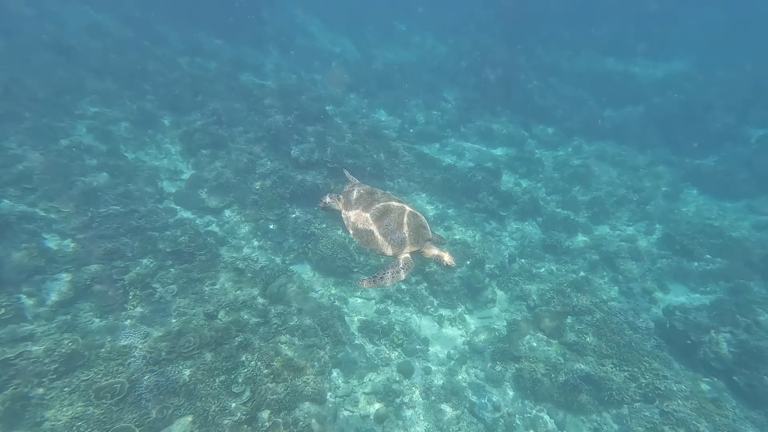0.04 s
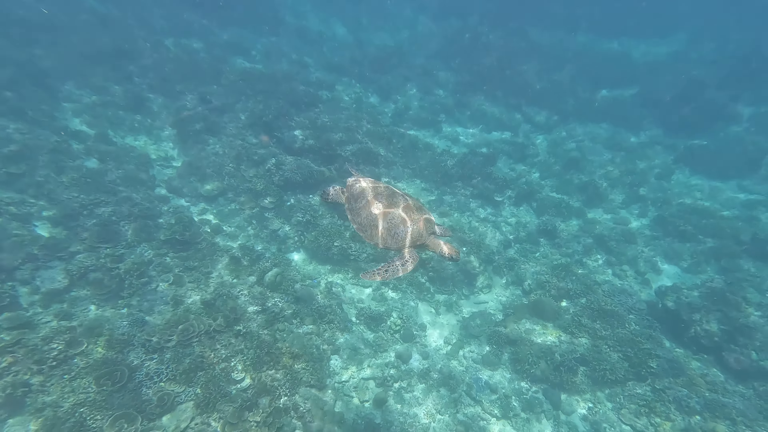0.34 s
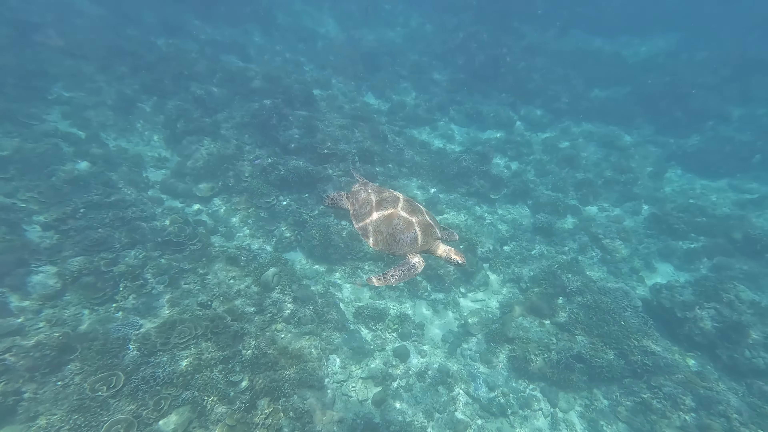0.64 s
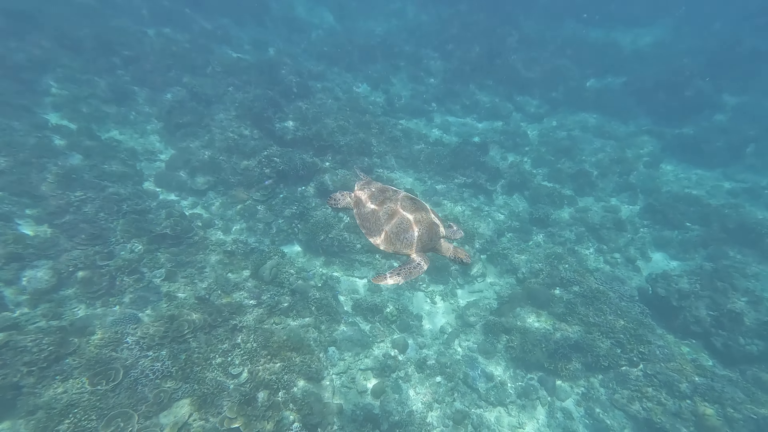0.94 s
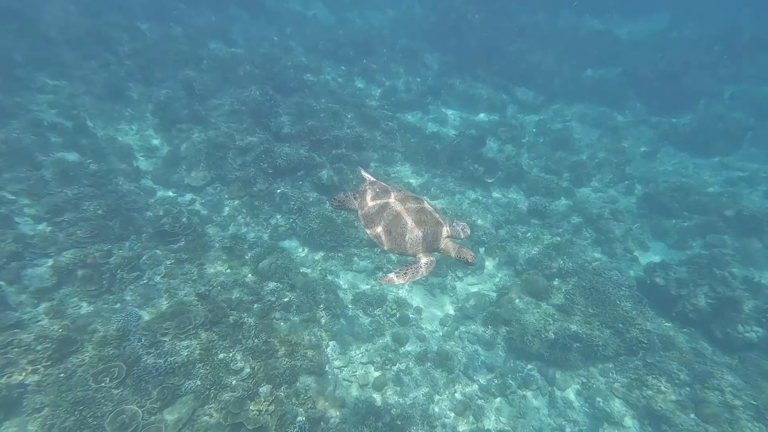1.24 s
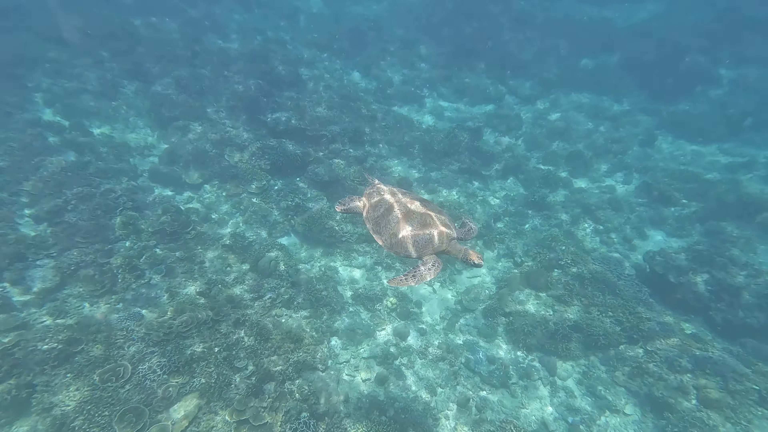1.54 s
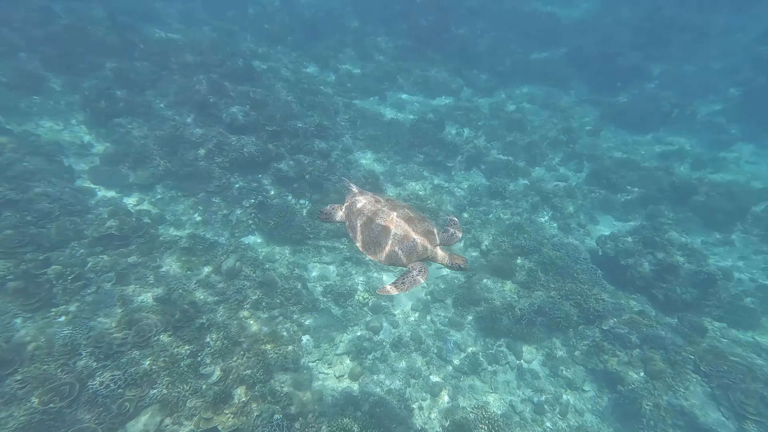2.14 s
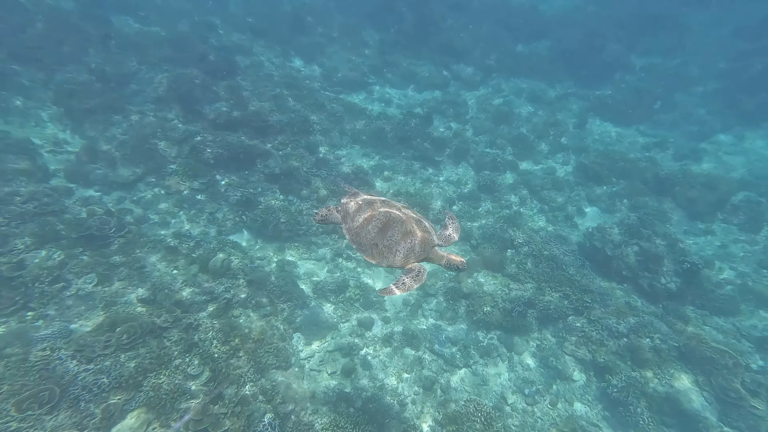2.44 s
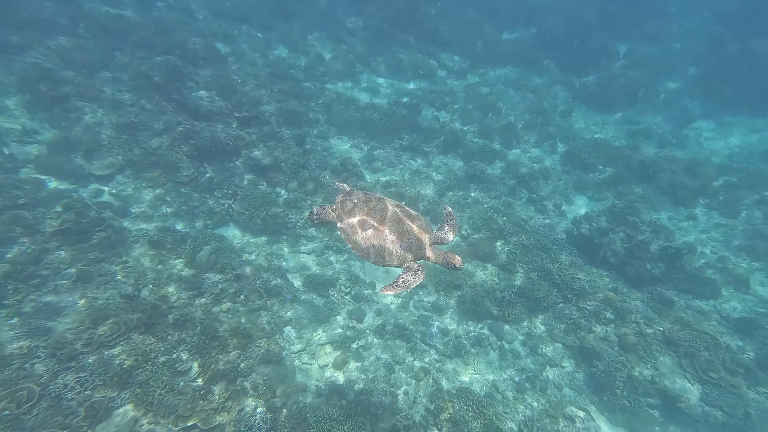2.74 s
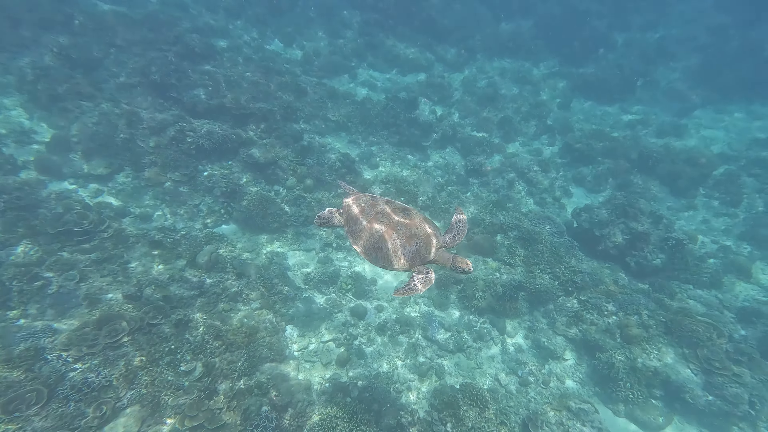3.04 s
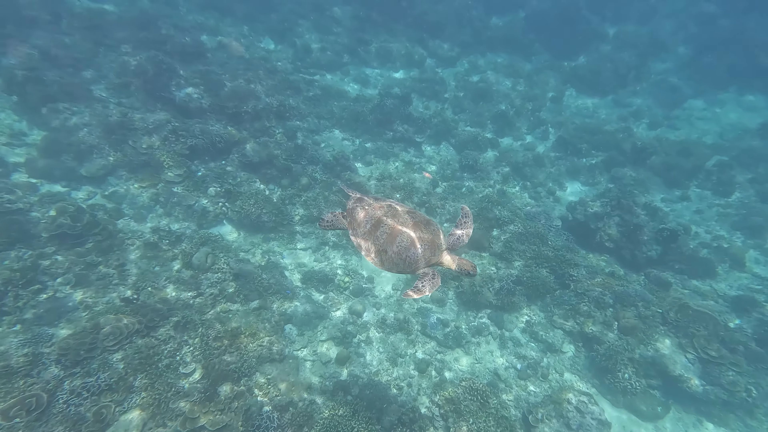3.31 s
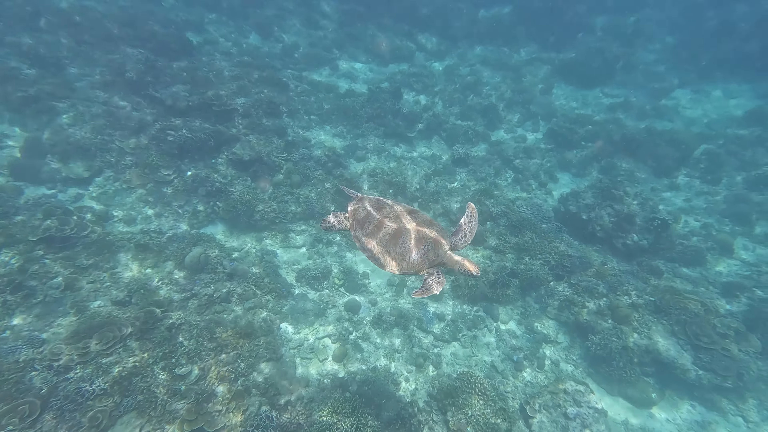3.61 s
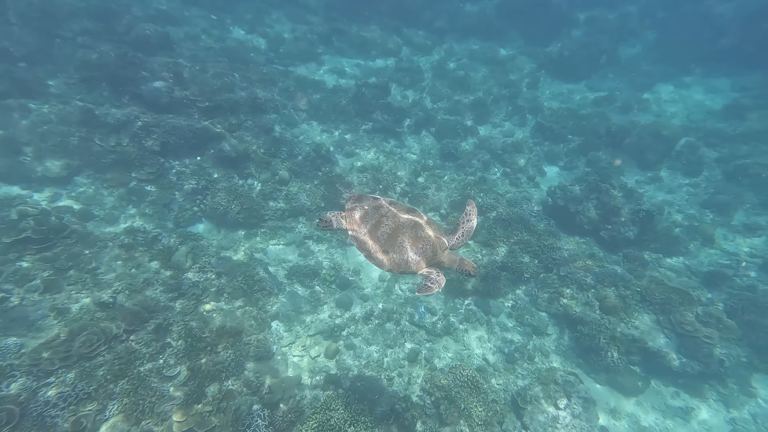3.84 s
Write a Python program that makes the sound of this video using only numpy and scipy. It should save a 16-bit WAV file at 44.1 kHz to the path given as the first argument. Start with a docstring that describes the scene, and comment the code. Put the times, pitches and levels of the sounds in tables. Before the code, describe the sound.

Sharp clicks and crackles fill an underwater reef, above a muffled rumble, soft bubbling and occasional bumps on the camera case.

```python
"""Snapping shrimp crackle all over a coral reef, heard underwater from a microphone inside a drifting,
hand-held waterproof camera case. Each claw collapses a cavitation bubble whose pressure spike rings the
case: close snaps click sharply, the countless far ones merge into a steady whine. Water rumbles past and
slaps the case, the surface washes overhead, small bubbles gurgle close by, and the hand knocks the case
a few times. The camera's gain ducks after the loudest peaks."""
import sys
import numpy as np
from scipy import signal
from scipy.fft import rfft, irfft, next_fast_len
from scipy.io import wavfile
from scipy.ndimage import map_coordinates

SR = 44100
rng = np.random.default_rng(int(sys.argv[2]) if len(sys.argv) > 2 else 0)


def store_pcm(level_fs):
    """Save levels as 16-bit WAV."""
    pcm = np.round(np.clip(level_fs, -1, 1) * 32767).astype(np.int16)
    wavfile.write(sys.argv[1], SR, np.atleast_2d(pcm).T)


N = 288855


def amp(db):
    """Decibels to gain."""
    return 10 ** (np.asarray(db) / 20)


def unit_rms(x):
    """x scaled to rms 1."""
    return x / np.sqrt(np.mean(x ** 2) + 1e-20)


def spectrum_db(points, hz):
    """Rows of freq_hz, level_db read at hz on a log axis."""
    freq_hz, level_db = np.transpose(points)
    return np.interp(np.log(hz + 1), np.log(freq_hz), level_db)


def level_curve(points):
    """Rows of time_s, level_db joined into one level per sample."""
    time_s, level_db = np.transpose(points)
    return np.interp(np.arange(N) / SR, time_s, level_db)


def wobble(rate_hz):
    """A smooth random curve with rate_hz knots a second."""
    knots = rng.standard_normal(int(N * rate_hz / SR) + 4)
    return map_coordinates(knots, [np.arange(N) * rate_hz / SR])


def filtered(x, response):
    """x through a filter whose gain is response(hz)."""
    size = next_fast_len(N + SR // 2)
    return irfft(rfft(x, size) * response(np.fft.rfftfreq(size, 1 / SR)), size)[:N]


def noise(spectrum):
    """Coloured noise of rms 1."""
    return unit_rms(filtered(rng.standard_normal(N), lambda hz: amp(spectrum_db(spectrum, hz))))


def add(track, start_s, sound):
    """Mix a sound into the track from start_s."""
    start = int(np.clip(round(start_s * SR), 0, N))
    track[start:start + len(sound)] += sound[:N - start]


# Strength of the water moving right past the case: time_s, level_db
FLOW_LEVELS = [(0.0, -30), (0.56, -31.5), (0.95, -36.5), (1.4, -27), (2.55, -31), (2.9, -29), (3.61, -36),
               (4.23, -27.5), (4.82, -32), (5.58, -25), (6.33, -32.5), (6.55, -34)]
# Spectra of its slow swells and of its eddies: freq_hz, level_db
SWELL_SPECTRUM = [(10, -12), (20, -1), (36, 0), (52, -8), (80, -18), (140, -38), (600, -120)]
EDDY_SPECTRUM = [(35, -27), (70, 3), (110, -2.5), (170, -10), (300, -16), (900, -58), (3000, -120)]

def water_flow():
    """One flow drives both the slow pressure swells and the smaller eddies on the case."""
    flow_db = level_curve(FLOW_LEVELS)
    swells = amp(flow_db + 0.5 + 3.4 * wobble(rate_hz=8.8)) * noise(SWELL_SPECTRUM)
    eddies = amp(flow_db - 11 + 3.5 * wobble(rate_hz=22)) * noise(EDDY_SPECTRUM)
    return swells + eddies


# Strength of the wash at the surface, above the microphone: time_s, level_db
WASH_LEVELS = [(0.0, -36.5), (0.22, -35), (0.46, -40.5), (1.06, -45.5), (1.95, -38.5), (2.59, -41),
               (3.04, -45.5), (3.81, -42), (4.07, -39), (4.98, -32), (6.29, -45), (6.55, -40.5)]
# Spectrum of its swish: freq_hz, level_db
SWISH_SPECTRUM = [(90, -33.5), (170, -0.5), (250, 1), (330, -5), (400, -0.5), (490, 4), (580, -9.5),
                  (680, 0.5), (830, -18), (1200, -14.5), (5000, -120)]

def surface_wash():
    """The surface washes overhead with a low, fluttering swish."""
    return amp(level_curve(WASH_LEVELS) - 1.5 + 1.7 * wobble(rate_hz=40)) * noise(SWISH_SPECTRUM)


def bubbles(length_s, pitch_hz, count, spread, cycles, rise=0.63):
    """Bubbles born within length_s; each rises in pitch as it rings down 40 dB in about `cycles` cycles."""
    t = np.arange(int((length_s + 0.094) * SR)) / SR
    birth_s = length_s * rng.random((count, 1))
    hz = pitch_hz * np.exp(spread * rng.standard_normal((count, 1)))
    age_s = np.maximum(t - birth_s, 0)
    life = age_s * hz / cycles
    envelope = rng.uniform(0.09, 1, (count, 1)) * amp(-40 * life)
    phase = 2 * np.pi * hz * age_s * (1 + rise * np.minimum(life, 1))
    cloud = np.sum(envelope * np.sin(phase), axis=0)
    return cloud / np.sqrt(np.sum(cloud ** 2) / (length_s * SR))


def stray_bubbles(count, pitch_hz):
    """Single small bubbles burble on, louder where the surface washes harder."""
    out = np.zeros(N)
    for when, size, tone in rng.random((count, 3)):
        bubble = bubbles(0.01017, pitch_hz * 2 ** (2 * tone - 1), count=1, spread=0.16, cycles=6.9)
        add(out, when * N / SR, size ** 2 * bubble)
    return amp(level_curve(WASH_LEVELS) - 8) * unit_rms(out)


# Bubble clouds close beside the case: start_s, rms_db, length_s, pitch_hz
BUBBLE_CLOUDS = [(.267, -33.5, 0.018, 425), (0.809, -30, 0.016, 414), (1.42, -33, 0.0119, 350),
                 (1.835, -37, .12, 396), (2.671, -28.5, 0.055, 534), (3.247, -37, .045, 766),
                 (3.354, -32, .06, 443), (3.626, -33.5, 0.017, 530), (3.679, -32.5, 0.02, 540),
                 (3.739, -42.5, 0.055, 504), (3.859, -36.5, .02, 510), (3.961, -34, .099, 423),
                 (5.501, -30.5, 0.042, 348), (5.585, -31.5, 0.023, 301), (5.689, -32, .041, 193),
                 (6.039, -31.5, 0.02, 684), (6.354, -32.5, .012, 575), (6.466, -29, 0.01, 540)]

def gurgles():
    """Air stirred into the water breaks up; longer gurgles hold more bubbles."""
    out = np.zeros(N)
    for start_s, rms_db, length_s, pitch_hz in BUBBLE_CLOUDS:
        count = 4 + int(300 * length_s)
        add(out, start_s, amp(rms_db) * bubbles(length_s, pitch_hz, count, spread=0.35, cycles=8.1))
    return out


# Water slapping directly on the case: start_s, peak_db, pitch_hz
WATER_SLAPS = [(0.596, -14, 41.4), (0.653, -18, 53.3), (0.697, -16.5, 45.7), (1.2, -29.5, 106),
               (1.64, -17.5, 61.4), (1.711, -21, 77.5), (2.562, -26, 45), (2.736, -18, 62),
               (4.029, -19, 67), (5.311, -21, 60), (5.361, -23, 48.7), (5.492, -15, 34.8), (5.659, -17, 45),
               (5.75, -15, 55.4), (5.847, -10.5, 59), (6.283, -14.5, 53.3)]

def water_slaps(rise_cycles):
    """Each slap rocks the case for two or three cycles."""
    out, t = np.zeros(N), np.arange(SR // 4) / SR
    for start_s, peak_db, pitch_hz in WATER_SLAPS:
        age = pitch_hz * t / rise_cycles
        swell = age ** 2 * np.exp(2 - 2 * age)
        add(out, start_s, amp(peak_db) * swell * np.sin(2 * np.pi * pitch_hz * t))
    return out


# Low modes of the case held in the hand: pitch_hz, level_db, t60_s
HELD_CASE_MODES = [(91, -15, 0.035), (159.3, -6.5, 0.16), (242, 2, 0.035), (344, 13.5, 0.044)]
# Skin rubbing on the case: freq_hz, level_db
SCUFF_SPECTRUM = [(80, 6.5), (250, 6), (700, -4), (1400, -1.5), (2500, -35), (7000, -71), (12000, -120)]
# Knocks on the case, right at the microphone: start_s, swing_db, contact_s, shove_db, scuff_db
HAND_KNOCKS = [(2.396, -26, 0.0029, -11, -13), (4.138, -8.5, 0.004, -29, -24),
               (4.852, -8.5, 0.0042, -31, -41), (5.168, -5, .0052, -40, -14),
               (6.507, -27, 0.0062, -15.5, -25.5)]

def hand_knocks():
    """A push of the hand shoves the case and sets it swinging, while the skin scuffs it."""
    out, scuff_envelope = np.zeros(N), np.zeros(N)
    t = np.arange(SR // 5) / SR
    for start_s, swing_db, contact_s, shove_db, scuff_db in HAND_KNOCKS:
        swing = sum(amp(level_db + rng.normal(0, 1) - 60 * t / t60_s) * np.cos(2 * np.pi * pitch_hz * t)
                    for pitch_hz, level_db, t60_s in HELD_CASE_MODES)
        push = np.sin(np.pi * np.minimum(t / contact_s, 1))
        thud = signal.fftconvolve(swing, push ** 2)[:len(t)]
        shove = amp(shove_db) * np.sqrt(np.abs(push))
        add(out, start_s, -amp(swing_db) * thud / np.abs(thud).max() - shove)
        add(scuff_envelope, start_s, amp(scuff_db - 60 * t / 0.053))
    scuffs = scuff_envelope * noise(SCUFF_SPECTRUM)
    # the soft hand and the wall pass little treble
    return filtered(out + scuffs, lambda hz: 1 / (1 + 1j * hz / 2500) ** 3)


# What the case wall lets through to the microphone: freq_hz, gain_db
WALL_RESPONSE = [(100, -33.5), (500, -26), (880, -29), (1300, -19), (1900, -12.5), (3200, -10.5),
                 (3900, -15), (4800, -36.5), (7400, -44.5), (8200, -55), (9500, -58.5), (11500, -72.5),
                 (15000, -84)]
# Resonances and antiresonances that colour the case's ring: centre_hz, width_hz, gain_db
CASE_RESONANCES = [(1480.5, 425, 17.5), (2200, 150, -29), (2594, 280, 14.5), (2803, 260, -7),
                   (3674, 270, 7.5), (7230, 510, 6)]

def case_ring(tilt_db_per_octave, round_db, colour_db=0, samples=2048):
    """The case's ring after one spike, peak 1; each direction of arrival gives it a random colour."""
    hz = np.fft.rfftfreq(samples, 1 / SR)
    db = spectrum_db(WALL_RESPONSE, hz)
    for centre_hz, width_hz, gain_db in CASE_RESONANCES:
        db += gain_db / (1 + (2 * (hz - centre_hz) / width_hz) ** 2)
    db += tilt_db_per_octave * np.log2(np.clip(hz, 1300, 4500) / 2000)
    # a rounder spike gathers its energy near the main resonances
    db -= round_db * np.log2(np.clip(hz, 1000, 6500) / 2400) ** 2
    db += colour_db * map_coordinates(rng.standard_normal(64), [hz / 400])
    # minimum phase: a sharp start, then the ringing
    cepstrum = irfft(np.log(amp(db)))
    response = np.exp(rfft(2 * cepstrum[:samples // 2], samples) - cepstrum[0])
    # bending waves in the wall disperse, so the ring swells over its first cycle
    dispersion = ((2500 - 1j * hz) / (2500 + 1j * hz)) ** 3
    ring = irfft(response * dispersion)
    return ring / np.abs(signal.hilbert(ring)).max()


def far_shrimp(count, level_db, tilt_db_per_octave):
    """The farthest snaps overlap and keep the case ringing in a slightly wavering whine."""
    spikes = np.bincount(rng.integers(N, size=count), rng.standard_normal(count), N)
    waver_db = 1.3 * wobble(rate_hz=6)
    whine = signal.fftconvolve(spikes, case_ring(tilt_db_per_octave, round_db=-4.0))[:N]
    return amp(level_db + waver_db) * unit_rms(whine)


def reef_echo(snaps, t60_s, level_db):
    """Coral heads and the rippled surface scatter each snap into a short, sparse, ever-changing tail."""
    t = np.arange(SR // 10) / SR
    out, hop = np.zeros(N), SR // 12
    window = signal.windows.cosine(2 * hop)
    for start in range(0, N, hop):
        part = snaps[start:start + 2 * hop]
        tail = rng.standard_normal(len(t)) ** 3 * amp(-60 * t / t60_s) * (t > .002)
        add(out, start / SR, signal.fftconvolve(part * window[:len(part)], tail / np.linalg.norm(tail)))
    return amp(level_db) * out


def midrange_shrimp(count, near_db, far_db, tilt_db_per_octave, tilt_spread):
    """Shrimp spread evenly over the reef, heard by 1 / distance: many faint snaps, few strong ones."""
    out = np.zeros(N)
    for area, (when, tone) in zip(np.linspace(0, 1, count), rng.random((count, 2))):
        distance = np.sqrt(amp(-2 * near_db) + area * amp(-2 * far_db))
        ring = case_ring(tilt_db_per_octave + tilt_spread * (2 * tone - 1), round_db=-1.14, colour_db=3)
        add(out, when * N / SR, ring / distance)
    return out


# Snaps of the shrimp closest to the microphone: start_s, peak_db, tilt_db_per_octave
CLOSE_SNAPS = [(0.0038, -7.5, 3), (0.0956, -11, 0.5), (0.1326, -11, 10.5), (0.1519, -7, 3),
               (0.221, -8.5, -3.5), (0.3063, -13, 1), (0.347, -8.5, 3), (0.372, -9, -4.5),
               (0.4164, -6.5, 1.5), (0.4311, -4, 2), (0.4659, -6.5, 1), (0.4746, -9.5, -4.5),
               (0.6471, -5, -3.5), (0.6773, -7, 5), (0.704, -7.5, 4.5), (0.7739, -8.5, -6),
               (0.9477, -10.5, 13), (1.0195, -7, 3.5), (1.0432, -5.5, 3), (1.0635, -7, 4.5),
               (1.1605, -10.0, 3), (1.2419, -10, -10.5), (1.385, -12.5, -4), (1.394, -8.5, -4),
               (1.4116, -7, -1.5), (1.4619, -7.5, -1.5), (1.5061, -1.0, -6), (1.5834, -5, -3),
               (1.6313, -5, 4.5), (1.6749, -9.5, 12.5), (1.691, -11, -15), (1.7884, -14, -9),
               (1.8051, -10, -12.5), (1.8313, -8.0, -3), (1.9763, -9.5, 3), (1.9867, -3, -1),
               (2.0262, -10, 1.5), (2.108, -10, 7), (2.129, -7.5, 10), (2.1676, -9.5, 5),
               (2.206, -7.5, 0.5), (2.2302, -7, 7.5), (2.2656, -14, -5), (2.3371, -8, 11.5),
               (2.3899, -9, 5.5), (2.403, -8.5, -5), (2.4379, -6.5, -5.5), (2.5195, -10.5, -13.5),
               (2.5451, -5.5, 11.5), (2.6117, -5.5, -5), (2.6954, -10.5, -9), (2.705, -6.5, -2),
               (2.7197, -8.5, -10), (2.7429, -11, 12.5), (2.7523, -9.5, 1), (2.8248, -6.5, -4),
               (2.9822, 0.5, -6), (3.124, -6, -0.5), (3.1814, -11, 0.5), (3.252, -10, -0.5),
               (3.29, -6, -1.5), (3.331, -10, 1), (3.3404, -11, 0), (3.3501, -6.5, 8), (3.4686, -9.5, 14.5),
               (3.5168, -10, -3.5), (3.5864, -8.5, -6), (3.618, -8.0, 3), (3.889, -8.5, 4.5),
               (3.953, -11.0, 4.5), (3.9807, -8, 2), (3.9914, -6.5, 6), (4.0142, -6, -3),
               (4.0285, -8, -0.5), (4.1164, -10.5, -2), (4.2425, -4, -4.5), (4.272, -7, 1.5),
               (4.3063, -11, -0.5), (4.4018, -8, -4.5), (4.4546, -9, -9), (4.4787, -9.5, -1),
               (4.5005, -6.5, 1), (4.5426, -2.5, -3), (4.5674, -2.5, -9), (4.6646, -14, -6),
               (4.6828, -9.5, -7.5), (4.6909, -9.5, 6), (4.7156, -10.0, 7), (4.7703, -9, 8.5),
               (4.8141, -13, -0.5), (4.87, -12, -12), (4.9073, -8.5, 7), (4.928, -11.5, 2), (4.9622, -9, 6),
               (5.0776, -13.5, 15), (5.118, -9.5, -1.5), (5.1668, -5, -4.5), (5.19, -7.5, 4.5),
               (5.2702, -11.5, 3), (5.286, -10.5, 7), (5.4176, -8, -10), (5.473, -12.5, -7),
               (5.533, -6, -1), (5.5602, -12.5, -3), (5.6668, -8.5, -6), (5.6984, -10.5, -3),
               (5.7848, -5.5, 0.5), (5.8356, -10.0, 5.5), (5.86, -4.5, -1), (6.1034, -3, -9),
               (6.1842, -14, -10.5), (6.2473, -7.5, -2), (6.2625, -9.5, 9), (6.2961, -14, -16),
               (6.302, -5.5, -5.5), (6.3333, -14, 10.5), (6.3507, -11, 0), (6.3655, -12.0, -5),
               (6.4232, -10.0, 4), (6.5449, -9, 11)]

def close_shrimp(round_above_db):
    """Each claw collapses a cavitation bubble: one pressure spike that rings the case."""
    out = np.zeros(N)
    for start_s, peak_db, tilt_db_per_octave in CLOSE_SNAPS:
        # a bigger bubble is louder and its spike is rounder
        round_db = 0.28 * max(peak_db - round_above_db, 0)
        add(out, start_s, amp(peak_db) * case_ring(tilt_db_per_octave, round_db, colour_db=3))
    return out


def scene():
    """The reef as it reaches the single microphone inside the case."""
    snaps = close_shrimp(round_above_db=-11)
    snaps += midrange_shrimp(count=1000, near_db=-12, far_db=-25, tilt_db_per_octave=0.45, tilt_spread=13.6)
    echo = reef_echo(snaps, t60_s=0.066, level_db=-12)
    whine = far_shrimp(count=16000, level_db=-37, tilt_db_per_octave=0.19)
    air = gurgles() + stray_bubbles(count=450, pitch_hz=541)
    handling = hand_knocks()
    water = water_slaps(rise_cycles=0.76) + water_flow() + surface_wash()
    return (water + air + handling + whine + echo + snaps)[None]


def gain_control(x, threshold_db, attack_s, release_db_per_s):
    """The gain ducks just after a loud peak, then recovers at a steady rate."""
    over_db = np.maximum(20 * np.log10(np.abs(x) + 1e-9) - threshold_db, 0)
    ramp_db = release_db_per_s * np.arange(N) / SR
    duck_db = np.maximum.accumulate(over_db + ramp_db) - ramp_db
    lag = np.exp(-1 / (attack_s * SR))
    return x * amp(-signal.lfilter([1 - lag], [1, -lag], duck_db))


def record(dry):
    """The camera ducks after the loudest peaks and keeps nothing above 15.8 kHz."""
    ducked = gain_control(dry[0], threshold_db=-6.5, attack_s=0.004, release_db_per_s=40.5)
    return filtered(ducked, lambda hz: hz < 15800)[None]


dry = scene()
out = record(dry)
store_pcm(out)
```